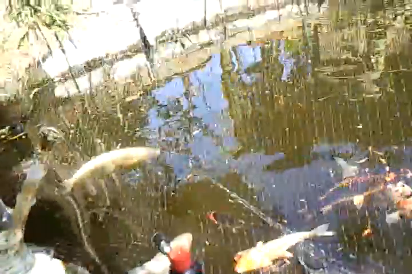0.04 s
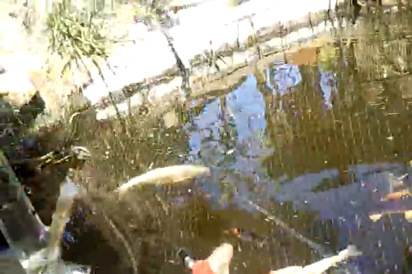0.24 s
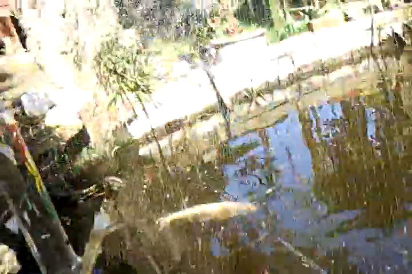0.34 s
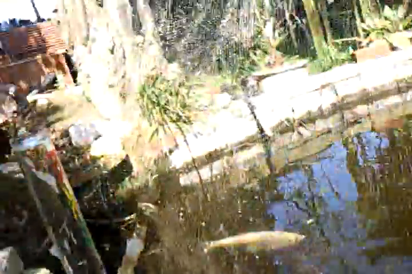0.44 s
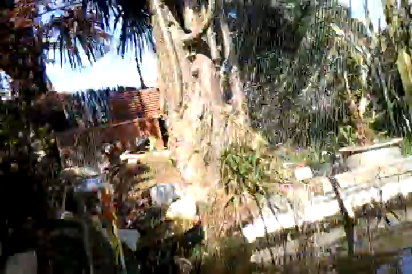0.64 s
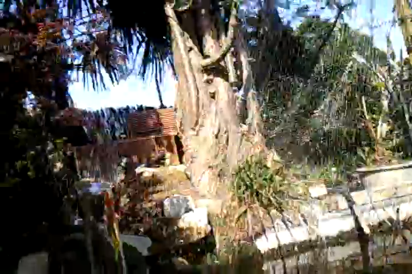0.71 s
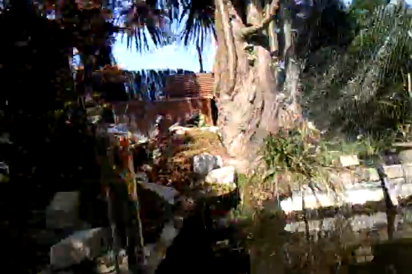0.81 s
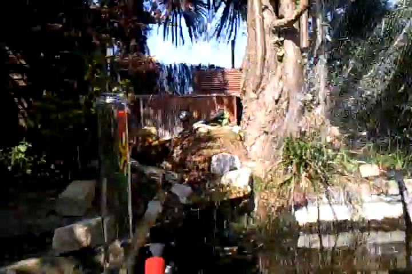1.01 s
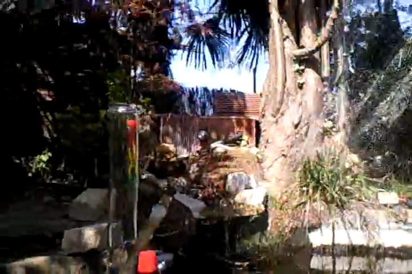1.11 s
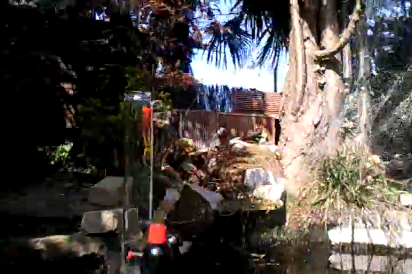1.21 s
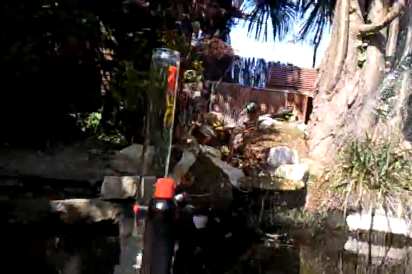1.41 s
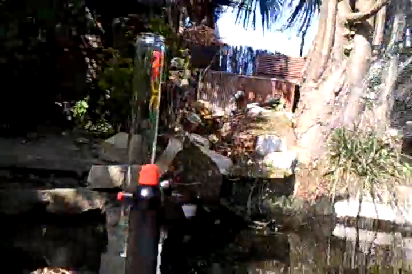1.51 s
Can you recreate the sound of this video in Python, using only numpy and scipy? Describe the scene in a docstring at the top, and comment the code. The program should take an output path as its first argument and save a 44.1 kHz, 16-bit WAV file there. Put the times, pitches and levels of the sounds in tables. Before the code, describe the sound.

Water trickles steadily into a garden pond, with small splashes, bubbles and a low gurgle. At the start a finger loudly bumps, covers and rubs the microphone, letting go with two clicks. The small outdoor microphone sounds dull.

```python
"""A finger bumps the camera, covers the microphone, rubs across it and lets go with two clicks.
Behind it, water trickles steadily into a garden pond: drops splash, trapped bubbles ring, and the
larger ones make a low gurgle. Near the end the hand shifts softly.
The small recorder is narrow in band and overloads on the first bump."""
import sys
import numpy as np
from scipy import signal
from scipy.fft import rfft, irfft
from scipy.io import wavfile
from scipy.ndimage import uniform_filter1d

SR = 44100
rng = np.random.default_rng(int(sys.argv[2]) if len(sys.argv) > 2 else 0)


def transcribe(u):
    """Save the signal u as a 16-bit wav file named by the first command-line argument.

    u: samples, shape (n,) or (channels, n), limited to [-1, 1]; the rate is SR.
    q: integer samples, one column per channel.
    """
    v = np.clip(np.atleast_2d(u).T, -1, 1)
    q = np.round(v * 32767).astype(np.int16)
    wavfile.write(sys.argv[1], SR, q)


N = 68355
T = np.arange(N) / SR


def amp(db):
    return 10 ** (np.asarray(db) / 20)


def unit_rms(x):
    return x / np.sqrt(np.mean(x ** 2) + 1e-20)


def envelope(table, column=1):
    """Gain over time from a dB column."""
    rows = np.array(table)
    return amp(np.interp(T, rows[:, 0], rows[:, column]))


def colour(x, spectrum):
    """Filters x by a spectrum table, to rms 1."""
    hz, db = np.transpose(spectrum)
    f = np.fft.rfftfreq(2 * N, 1 / SR)
    gain = amp(np.interp(np.log(f + 1), np.log(hz), db))
    return unit_rms(irfft(rfft(x, 2 * N) * gain)[:N])


def add(mix, start_s, sound):
    part = mix[max(round(start_s * SR), 0):][:len(sound)]
    part += sound[:len(part)]


def clicks(per_s, spread_db):
    """Random impulses of uneven size."""
    impulses = (rng.random(N) < per_s / SR) * rng.choice([-1, 1], N)
    return impulses * amp(spread_db * np.minimum(rng.exponential(1, N), 3))


def noise_burst(decay_s, size=2048):
    return rng.standard_normal(size) * np.exp(-T[:size] / decay_s)


# outdoor rumble spectrum: f/Hz, level/dB
AIR_SPECTRUM = [(20, -32), (50, -15), (90, -10), (135, -0.5), (200, -9), (270, -6.5), (400, -11.5),
                (800, -35)]


def air(level_db=-58.5):
    """Outdoor air rumbles, low and steady."""
    return amp(level_db) * colour(rng.standard_normal(N), AIR_SPECTRUM)


# strength of the trickle: t/s, level/dB
FLOW_GAIN = [(0, 1), (0.48, 0), (0.55, 0.5), (0.62, 1.5), (0.8, 0.5), (0.93, 1), (1.04, -2.5), (1.14, 1),
             (1.32, -0.5), (1.4, 2.5), (1.55, 1)]


def flow():
    """The trickle swells and ebbs slightly."""
    return envelope(FLOW_GAIN)


# distant water spectrum: f/Hz, level/dB
WASH_SPECTRUM = [(150, -23), (330, -4.5), (450, 5), (560, -2), (680, 0), (900, -6), (1250, -23),
                 (2000, -10.5), (2600, -18), (3600, -6), (4400, -11.5)]


def wash(level_db=-54, flicker_db=1.5):
    """Distant water and air blur into noise that flickers in patches of time and pitch."""
    cells = signal.stft(rng.standard_normal(N), nperseg=512)[2]
    patches = uniform_filter1d(rng.standard_normal(cells.shape), size=6, axis=0)
    patches = unit_rms(uniform_filter1d(patches, size=4, axis=1))
    noise = signal.istft(cells * amp(flicker_db * patches), nperseg=512)[1][:N]
    return amp(level_db) * colour(noise, WASH_SPECTRUM) * flow()


def garden_echoes(x, t60_s=0.17, level_db=-7.5, gap_s=0.003, size=8000):
    """The stone rim and the rockery add short scattered echoes to x."""
    t = T[:size]
    tail = rng.standard_normal(size) * amp(-60 * t / t60_s) * (t > gap_s)
    return x + amp(level_db) * signal.fftconvolve(x, tail / np.linalg.norm(tail))[:N]


# hand movement: t/s, level/dB
GRIP_LEVEL = [(1.3, -98), (1.35, -56.5), (1.38, -50), (1.42, -48), (1.45, -56), (1.53, -93)]
# grip friction spectrum: f/Hz, level/dB
GRIP_SPECTRUM = [(40, -25), (130, 0), (300, -2), (600, -12), (1100, -16.5), (3000, -26)]


def grip_shift(slips_per_s=700):
    """The hand shifts once, in a soft run of tiny slips."""
    return colour(clicks(slips_per_s, spread_db=2), GRIP_SPECTRUM) * envelope(GRIP_LEVEL)


# finger friction: t/s, rumble level/dB, scrape level/dB
RUB_LEVELS = [(0, -90, -77), (0.042, -70, -88), (0.056, -27.5, -44.5), (0.08, -32, -52),
              (0.12, -47.5, -61.5), (0.158, -42, -62), (0.19, -49.5, -66), (0.24, -40, -63),
              (0.275, -36, -47), (0.345, -38, -38.5), (0.385, -44, -50), (0.44, -86, -92)]
# skin rumble spectrum: f/Hz, level/dB
RUMBLE_SPECTRUM = [(20, -25.5), (55, -16), (90, 5), (150, -1.5), (260, -16.5), (500, -21), (1200, -59)]
# skin scrape spectrum: f/Hz, level/dB
SCRAPE_SPECTRUM = [(60, -25), (200, 5.5), (450, 4.5), (900, 1), (1800, -10), (4000, -32.5)]


def finger_rub(slips_per_s=700):
    """Skin rumbles and slips on the case."""
    rumble = colour(rng.standard_normal(N), RUMBLE_SPECTRUM)
    scrape = colour(clicks(slips_per_s, spread_db=2.5), SCRAPE_SPECTRUM)
    return rumble * envelope(RUB_LEVELS, column=1) + scrape * envelope(RUB_LEVELS, column=2)


# pond gain past the finger: t/s, level/dB
COVER_GAIN = [(0, 2.5), (0.045, -3), (0.085, -17), (0.225, -19.5), (0.28, -6.5), (0.37, -9.5), (0.41, 1),
              (0.46, -2.5)]


def finger_cover(pond):
    """The finger over the microphone briefly shuts out the pond."""
    return pond * envelope(COVER_GAIN)


# camera case modes: f/Hz, width/Hz, level/dB
CASE_MODES = [(164, 61, -9.5), (900, 180, -11.5), (1720, 220, -12)]
# contact crack spectrum: f/Hz, level/dB
CRACK_SPECTRUM = [(100, -12), (450, 1.5), (850, 8), (1300, -5.5), (1800, 1.5), (2600, -3.5), (4000, -7.5)]
# finger impacts: t/s, thud peak/dB, time constant/ms, crack re peak/dB, sign (+1 press, -1 release)
FINGER_BUMPS = [(0.0436, -21, 0.39, -24, -1), (0.0466, -16.5, 0.065, -19, -1), (0.0496, -12.5, 0.8, -33, 1),
                (0.0508, -2, 0.64, -40, -1), (0.0723, -25.5, 0.74, -34.5, 1),
                (0.2492, -27.5, 0.57, -39, -1), (0.2576, -24, 0.99, -24, 1), (0.294, -29.5, 1.3, -29.5, -1),
                (0.3044, -16, .9, -30, 1), (0.31, -28.5, 1.0, -33, 1), (0.328, -23.5, 0.2, -20, -1),
                (0.3295, -25, 0.45, -22.5, 1), (0.3472, -25, .2, -19, -1), (0.3497, -28, 0.23, -19.5, -1),
                (0.3643, -12.5, 0.17, -21.5, -1), (0.3639, -14.5, 0.67, -22, 1),
                (0.3655, -17, 0.21, -17.5, -1), (0.4227, -28.5, 0.1, -24.5, -1),
                (0.4252, -11, 0.058, -12.5, 1)]


def finger_bumps(bass_cut_hz=92, crack_decay_s=0.0023, size=6000):
    """Pressure pulses ring the case and swing through the microphone's bass cut, each with a crack."""
    out, t = np.zeros(N), T[:size]
    bass_cut = signal.butter(4, bass_cut_hz, "high", fs=SR, output="sos")
    grit = colour(rng.standard_normal(N), CRACK_SPECTRUM)
    for start_s, peak_db, tau_ms, crack_db, sign in FINGER_BUMPS:
        age = t * 1000 / tau_ms
        pulse = sign * age * np.exp(-age)
        ring = sum(amp(db) * signal.lfilter(*signal.iirpeak(hz, hz / width_hz, fs=SR), pulse)
                   for hz, width_hz, db in CASE_MODES)
        thud = signal.sosfilt(bass_cut, pulse + ring)
        crack = grit[round(start_s * SR):][:size] * np.exp(-t / crack_decay_s)
        add(out, start_s, amp(peak_db) * thud / abs(thud).max())
        add(out, start_s, amp(peak_db + crack_db) * crack)
    return out


# fine spray spectrum: f/Hz, level/dB
SPRAY_SPECTRUM = [(200, -25), (600, 11), (1400, -4), (2500, 1.5), (3600, 4), (4400, -6.5)]


def spray(drops_per_s=150, level_db=-55.5, layers=4):
    """Fine droplets tick on the surface at random."""
    ticks = np.zeros(N)
    for _ in range(layers):
        hits = clicks(drops_per_s / layers, spread_db=3.5)
        ticks += signal.fftconvolve(hits, noise_burst(decay_s=0.00053))[:N]
    return amp(level_db) * colour(ticks, SPRAY_SPECTRUM) * flow()


# large drops: t/s, level/dB, centre f/Hz, decay/s
DROP_SPLASHES = [(0.45, -44.5, 1900, .007), (0.4690, -37.5, 3640, 0.0092), (0.4986, -37.5, 3600, 0.01),
                 (0.5690, -38, 2050, 0.004), (0.6240, -40.5, 3250, 0.011), (0.72, -39.5, 2010, 0.0015),
                 (0.9870, -43, 1890, 0.011), (1.0909, -42.5, 1960, 0.0041), (1.0200, -37.5, 3480, 0.0049),
                 (1.058, -36, 3860, .004), (1.1298, -39.5, 1850, 0.0089), (1.1572, -37.5, 2270, 0.0049),
                 (1.2700, -42, 2050, 0.0042), (1.4390, -41, 3500, 0.0062), (1.484, -42, 3000, .003),
                 (1.5233, -32, 2370, 0.0023), (1.5410, -38, 1170, 0.0025)]


def splashes(width_hz=1500):
    """Large drops slap the surface, each a noise burst in its own band."""
    out = np.zeros(N)
    for start_s, db, hz, decay_s in DROP_SPLASHES:
        band = signal.iirpeak(hz, hz / width_hz, fs=SR)
        fizz = unit_rms(signal.lfilter(*band, rng.standard_normal(N)))
        add(out, start_s, amp(db) * fizz * np.exp(-T / decay_s))
    return out


def bubble(hz, decay_1khz_s=0.0076, rise_per_decay=0.021, onset_s=0.00026, size=3000):
    """Trapped air rings as a damped tone that glides up; small, high bubbles die sooner."""
    t = T[:size]
    decay_s = decay_1khz_s * (1000 / hz) ** 0.55
    glide_hz = hz * (1 + rise_per_decay * np.minimum(t / decay_s, 4))
    tone = np.sin(2 * np.pi * np.cumsum(glide_hz) / SR)
    return tone * (1 - np.exp(-t / onset_s)) * np.exp(-t / decay_s)


# bubble size classes: lowest f/Hz, highest f/Hz, rate/(1/s), level/dB
SWARM_BANDS = [(405.6, 799, 220, -56), (805, 2300, 260, -59.5), (2296, 4000, 340, -58.5)]


def bubble_swarms(spread_db=5, candidates=700):
    """Many faint bubbles ring at random; the lowest band gurgles."""
    out, duration_s = np.zeros(N), T[-1]
    for low_hz, high_hz, per_s, db in SWARM_BANDS:
        swarm = np.zeros(N)
        for chance, when, pitch, strength in rng.random((candidates, 4)):
            if chance < per_s * duration_s / candidates:
                hz = low_hz * (high_hz / low_hz) ** pitch
                gain = amp(spread_db * min(-np.log(strength), 2))
                add(swarm, when * duration_s, gain * bubble(hz))
        out += amp(db) * unit_rms(swarm)
    return out * flow()


# distinct bubbles: t/s, level/dB, starting f/Hz
CLEAR_BUBBLES = [(0.4488, -38, 1850), (0.4987, -31.5, 3442), (0.595, -44.5, 1690), (0.6479, -40, 2490),
                 (0.659, -35.5, 660), (0.6950, -42.5, 680), (0.7850, -41, 452), (0.8560, -43, 870),
                 (0.8980, -48.5, 622), (1.0909, -40, 2017), (1.0930, -39, 659), (1.1560, -40, 665),
                 (1.1991, -37, 2820), (1.3440, -37.5, 629), (1.3520, -38.5, 622), (1.386, -43.5, 1070),
                 (1.3950, -40.5, 2010), (1.4290, -41.5, 950), (1.4389, -39, 3475), (1.4570, -40, 638),
                 (1.4830, -40.5, 503), (1.525, -38, 1670)]


def clear_bubbles():
    """Single bubbles ring out above the swarms."""
    out = np.zeros(N)
    for start_s, db, hz in CLEAR_BUBBLES:
        add(out, start_s, amp(db) * bubble(hz))
    return out


def scene():
    """The pond, briefly covered, plus handling noise; mono."""
    trickle = bubble_swarms() + clear_bubbles() + spray() + splashes()
    pond = garden_echoes(trickle) + wash() + air()
    handling = finger_bumps() + finger_rub() + grip_shift()
    return (finger_cover(pond) + handling)[None]


def record(dry):
    """A narrow speech band, overload on the hardest bump, then a final low-pass."""
    band_hz, slope_hz, ceiling, lowpass_hz = 3885, 120, 0.707, 15850
    f = np.fft.rfftfreq(2 * N, 1 / SR)
    band_db = -5 * np.logaddexp(0, (f - band_hz) / slope_hz)
    narrow = irfft(rfft(dry, 2 * N) * amp(band_db))[:, :N]
    overloaded = np.clip(narrow, -ceiling, ceiling)
    lowpass = signal.firwin(511, lowpass_hz, window=("kaiser", 9), fs=SR)
    return signal.oaconvolve(overloaded, lowpass[None], "same")


dry = scene()
out = record(dry)
transcribe(out)
```